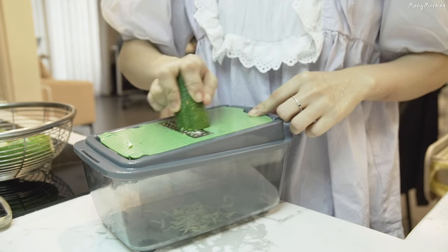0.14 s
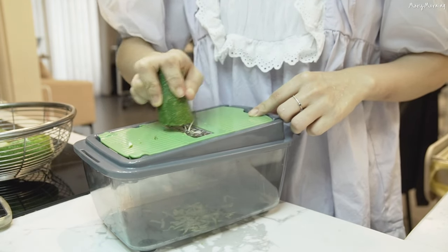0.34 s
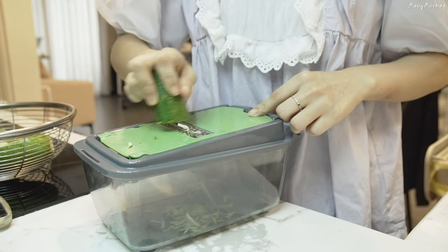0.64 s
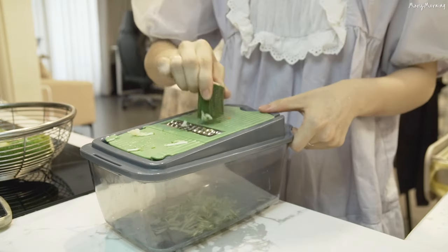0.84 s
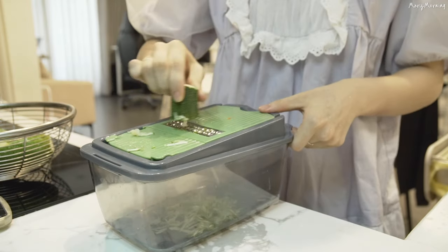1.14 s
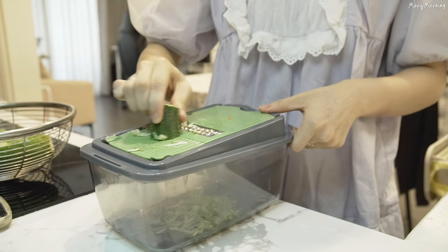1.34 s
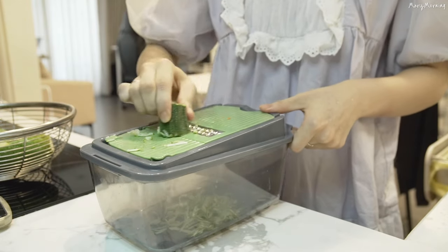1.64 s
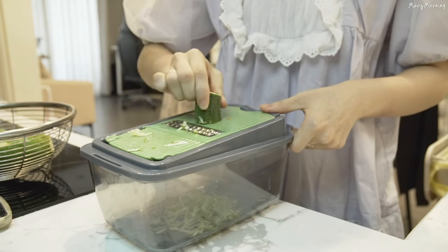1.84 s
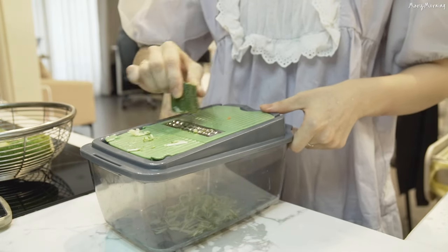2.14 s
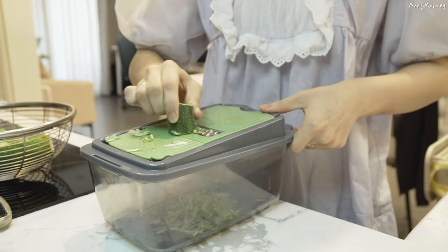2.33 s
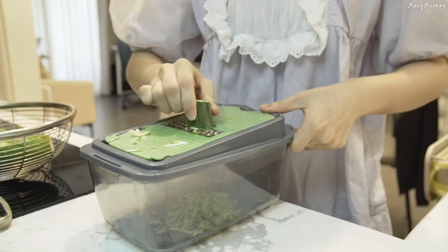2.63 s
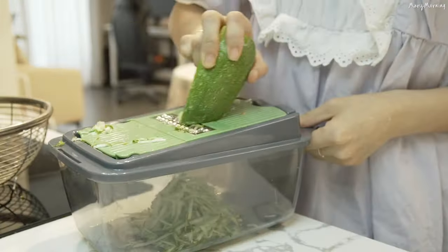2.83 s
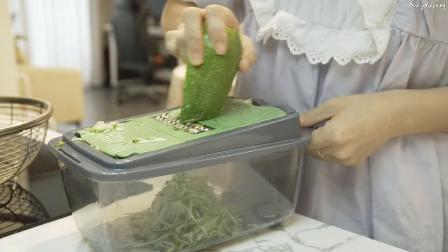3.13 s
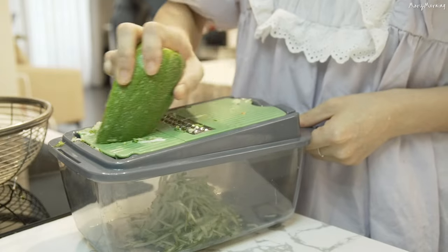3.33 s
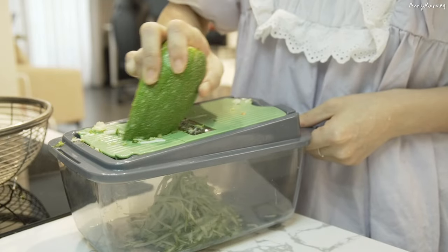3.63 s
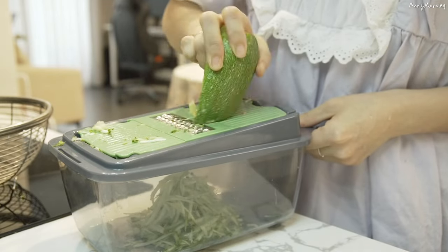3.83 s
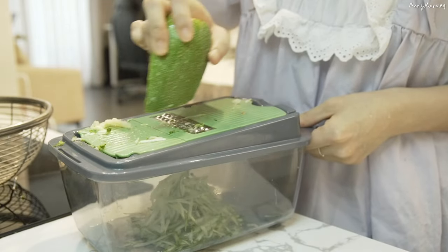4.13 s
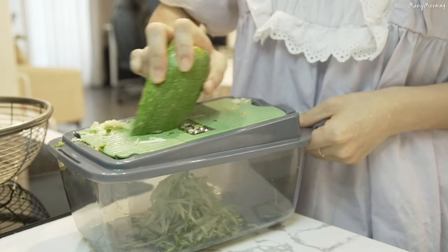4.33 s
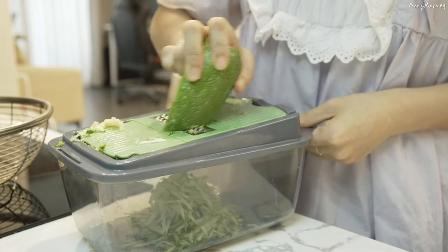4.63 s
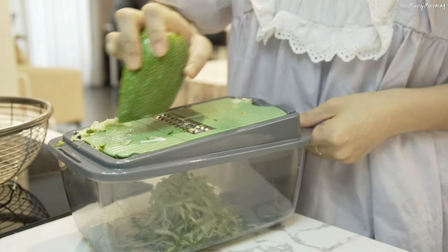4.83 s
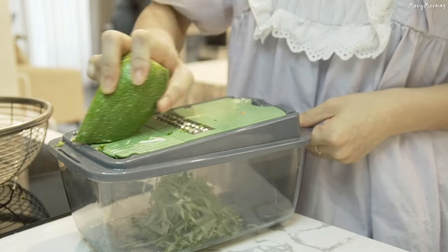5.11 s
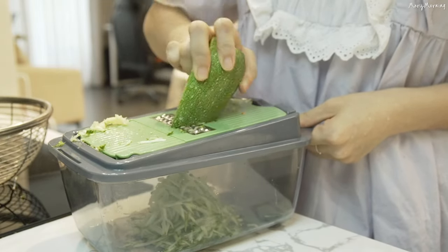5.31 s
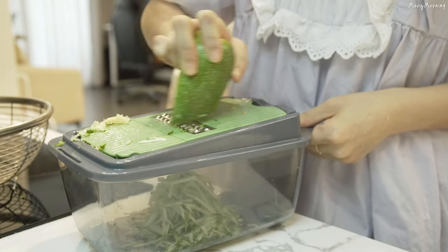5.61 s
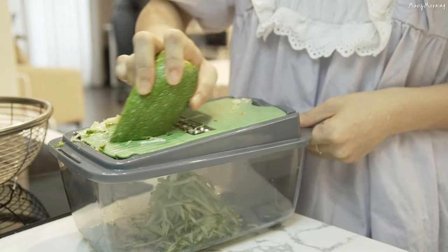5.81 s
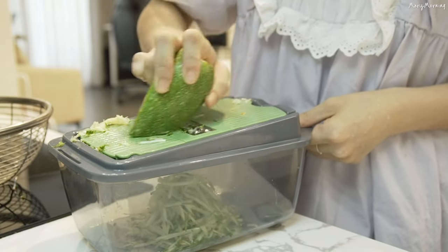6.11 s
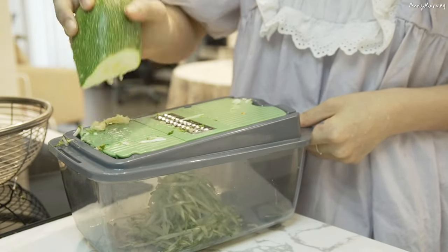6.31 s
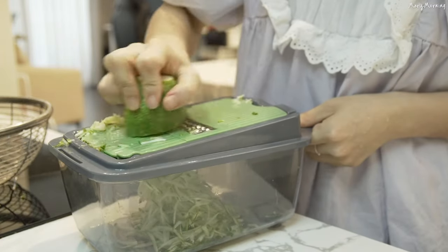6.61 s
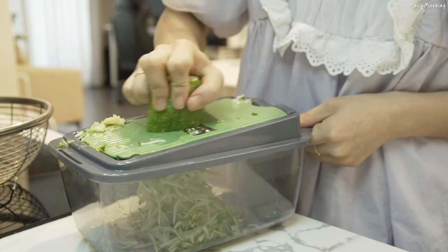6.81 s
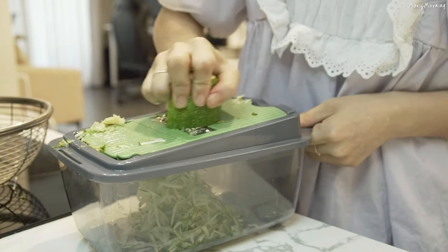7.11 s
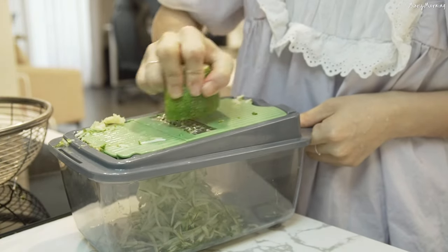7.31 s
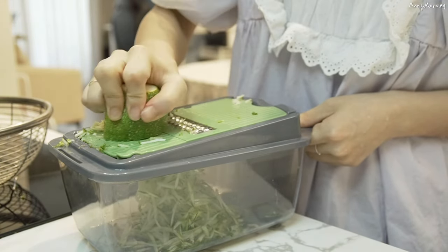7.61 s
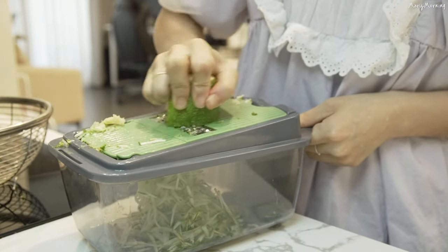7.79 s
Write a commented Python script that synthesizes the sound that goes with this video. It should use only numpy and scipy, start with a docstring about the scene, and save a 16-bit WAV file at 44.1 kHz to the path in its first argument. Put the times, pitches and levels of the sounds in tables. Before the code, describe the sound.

A close, fairly dry kitchen sound over a soft room noise. A small zucchini stub is pushed across julienne blades on a hollow plastic tub, with landings near 0.1, 0.5, 0.9, 1.2, 1.6, 1.9, 2.3 and 2.6 seconds. Each begins with a boxy, mid-low plastic knock, turns at once into a crisp wet rasp of about a fifth of a second, and fades in a slight rub. Dull tub jolts and light plastic ticks fall between. From 2.8 seconds a bigger piece continues at the same brisk pace, roughly every 0.35 seconds: landings are softer in thud but wetter and slappier, especially from 3.5 to 5 seconds, while hollow knocks of the rocking tub stand out between cuts. After about 6.4 seconds the slaps soften and rasping dominates, with a last stroke near 7.8 and a closing knock around 7.9.

```python
"""Zucchini on a julienne slicer

A short stub, then a big piece, is pushed over a julienne slicer on a plastic tub in a small kitchen.
Noisy contact forces ring tub, lid, blade plate and blade: each push lands with a knock,
tears through the blades as a wet rasp of random snaps, then rubs on. Jolts rock the tub at its main mode.
Light taps, a faint table boom, near echoes, a short room tail and soft room noise complete it."""
import sys
import numpy as np
from scipy import signal
from scipy.fft import rfft, irfft
from scipy.io import wavfile

SR = 44100
rng = np.random.default_rng(int(sys.argv[2]) if len(sys.argv) > 2 else 0)


def dump(signal):
    """Clip the signal to [-1, 1] and save it as 16-bit WAV at the path in sys.argv[1]."""
    limited = np.clip(np.atleast_2d(signal).T, -1, 1)
    pcm = np.round(limited * 32767).astype(np.int16)
    wavfile.write(sys.argv[1], SR, pcm)


N = 350595

# pushes; times after touchdown, levels relative: touchdown_s, thud_db, slap_db, reach_blades_s, end_s, effort_db
STROKES = [(0.124, -16, -37.5, 0.023, 0.22, -29), (0.457, -16, -62, 0.032, 0.14, -24),
           (0.916, -19, -53, 0.024, 0.15, -24), (1.235, -17.5, -55, 0.014, 0.17, -25),
           (1.558, -15.5, -56, 0.021, 0.21, -26), (1.892, -24.5, -59, 0.033, 0.21, -25),
           (2.255, -15, -49.5, 0.018, 0.21, -27.7), (2.601, -16, -37.5, .008, 0.21, -28.5),
           (2.843, -25, -39, 0.021, 0.16, -24.5), (3.181, -30, -41.5, 0.028, 0.18, -25),
           (3.524, -22.5, -32, 0.028, 0.21, -24.5), (3.865, -23, -28, 0.016, 0.19, -24),
           (4.229, -26, -34.5, 0.06, 0.21, -23.5), (4.589, -22.5, -29, .026, 0.23, -24.5),
           (4.97, -21.5, -29, .022, 0.21, -25), (5.338, -25, -39.5, .028, .2, -23),
           (5.681, -34, -47, 0.027, 0.19, -23.5), (6.04, -29.5, -34, .014, 0.2, -24.5),
           (6.391, -26.5, -56, 0.049, 0.21, -24), (6.735, -30.5, -61, .036, 0.2, -24.5),
           (7.08, -26, -61, .032, 0.22, -25), (7.418, -31.5, -63, 0.057, 0.23, -24.5),
           (7.764, -28.5, -47.5, 0.039, 0.25, -25)]
# jolts over or off the blades that rock the tub: start_s, relative_level_db
BUMPS = [(0.372, -30), (0.623, -14.5), (0.765, -20.5), (1.067, -18), (1.091, -16.5), (1.41, -14.5),
         (1.433, -18), (1.754, -17.5), (1.977, -15), (2.442, -10.5), (2.525, -29), (3.008, -17),
         (3.273, -9.5), (3.647, -8.5), (3.953, -13), (4.042, -11.5), (4.061, -16), (4.407, -9),
         (4.44, -20.5), (4.777, -11.5), (4.799, -14.5), (5.15, -9.5), (5.43, -14.5), (5.514, -14.5),
         (5.789, -19), (6.218, -8.5), (6.476, -12), (6.557, -15.5), (6.867, -10.5), (7.938, -14)]
# light taps of plastic and falling strips: start_s, relative_peak_db
TAPS = [(0.0094, -33), (0.682, -22), (0.7387, -26), (1.9404, -20), (2.0824, -23.5), (2.1755, -27),
        (2.2223, -27.5), (3.153, -29.5), (3.518, -19.5), (3.809, -34), (4.125, -30), (5.1487, -18.5),
        (5.9244, -36.5), (6.7221, -27), (6.9444, -27.5)]
# slicer resonances: centre_hz, width_hz, stub_db, big_piece_db
TUB_MODES = [(282.5, 51, -6, -10), (320, 20.2, -2.5, -1.5), (355.6, 15, 2, 1.5), (448.5, 14, 1.5, -10)]
LID_MODES = [(569, 66.5, -9, -9), (615.6, 46.3, -7, -6.5), (698.7, 25, -7.5, -11), (790, 74, -13, -14),
             (939, 29.6, -10, -12), (1135, 52, -14, -15), (1348, 54, -24, -22.5)]
PLATE_MODES = [(1568, 93, -15, -14.5), (1776, 79, -10.5, -14), (1958, 135, -11.5, -14.5),
               (2017, 53, -7, -11.5), (2200, 194, -19, -19), (2439, 69, -16.5, -17),
               (2752, 200, -18.5, -18), (3100, 233, -19, -23), (3240, 280, -18.5, -21)]
BLADE_MODES = [(2192, 19, -12, 0), (2287, 32, 1, -4.5)]
# colour of the wet tearing: frequency_hz, relative_db
HISS_COLOUR = [(2200, -21.5), (3200, -10), (3900, 6.5), (5000, 1), (6200, -0.5), (7800, -2.5), (10000, -4),
               (13000, -9.5), (16000, -13.5)]
# colour of the wet face slapping down: frequency_hz, relative_db
SLAP_COLOUR = [(2000, -29.5), (3200, -4), (5000, -11), (6500, -11.5), (9000, -18.5), (11500, -26.5),
               (16000, -26)]
# colour of the room noise: frequency_hz, relative_db
QUIET_COLOUR = [(18, -26), (30, -30), (145, -3.5), (355, 3.5), (1220, -9.5), (1390, -5.5), (2750, -15),
                (3580, -16.5), (3980, -20), (5040, -19), (5450, -21.5), (7870, -25), (9460, -17.5),
                (10200, -24.5), (16000, -28.5)]
# colour of what table and walls send in from the sides: frequency_hz, relative_db
SIDEWAYS_COLOUR = [(100, -23), (350, -22), (600, -11.5), (850, -1), (1200, -7), (2000, -5.5), (4000, -1.5),
                   (9000, -1), (16000, 0)]
# colour of the late room: frequency_hz, relative_db
ROOM_COLOUR = [(100, -4), (350, 1.5), (800, 3), (2500, 2.5), (6000, 0.5), (16000, -5)]

BIG_PIECE_S = 2.82  # the big piece is sliced from here on
TOP_HZ, TABLE_HZ = 16000, 90.1

# pairs: (stub, big piece)
FULL_CUT_S = (0.051, 0.1)  # after touchdown: all blades are in
EASE_S = (0.116, 0.12)  # after touchdown: the piece begins to run out of the blades
# cut levels relative to effort
CUT_TUB_DB, CUT_LID_DB, CUT_HISS_DB = (-1.2, 0.5), (-1.3, -1.46), (-5, -3.5)
# landing: lid follows thud, blade follows slap, plate takes some of each
LAND_LID_DB, LAND_PLATE_DB, LAND_BLADE_DB = (-9, -8.5), (2.2, 0.3), (-9, -1.3)
PLATE_SLAP_SHARE, BLADE_SLAP_SHARE = 0.51, 0.79

# the tub rocks lower under the hand's load and rises as the push lets up
LOADED_HZ, FREE_HZ = 324, 352
LET_UP_S = (0.072, 0.2)  # from, to; after touchdown
GRIP_SCATTER = 0.015  # pitch spread from jolt to jolt, as a share


def undb(db):
    """Decibels to gain."""
    return 10 ** (np.asarray(db) / 20)


def seconds(length_s):
    """Time axis."""
    return np.arange(int(length_s * SR)) / SR


def rms(x):
    """Root mean square, kept above zero."""
    return np.sqrt(np.mean(x ** 2)) + 1e-12


def add(track, start_s, x):
    """Mix x into the track at start_s."""
    i = max(int(start_s * SR), 0)
    track[i:i + len(x)] += x[:max(N - i, 0)]


def colour(x, points, size=2048):
    """Minimum-phase filter through (Hz, dB) points, falling 12 dB per octave below the first."""
    hz, db = np.transpose(points)
    f = np.maximum(np.arange(size // 2 + 1) * SR / size, 1)
    below_db = 40 * np.log10(np.clip(f / hz[0], 0.03, 1))
    response_db = np.interp(np.log(f), np.log(hz), db) + below_db
    # folding the cepstrum makes the filter causal
    cepstrum = irfft(np.log(undb(response_db)))
    cepstrum[1:size // 2] *= 2
    cepstrum[size // 2 + 1:] = 0
    impulse = irfft(np.exp(rfft(cepstrum)))
    return signal.fftconvolve(x, impulse)[:len(x)]


def ring(force, modes, start_s, detune=0.015):
    """Force excites modes of alternating sign; the hand's load shifts them a little each time."""
    out = 0
    for k, (hz, width_hz, stub_db, big_db) in enumerate(modes):
        hz = hz * (1 + detune * rng.standard_normal())
        band = signal.lfilter(*signal.iirpeak(hz, hz / width_hz, fs=SR), force)
        level_db = stub_db if start_s < BIG_PIECE_S else big_db
        out = out + (-1) ** k * undb(level_db) * band
    return out


def snaps(t, rate_hz, spread_db):
    """Random train of tiny ruptures of either sign and uneven size."""
    size = undb(spread_db * rng.standard_normal(len(t)))
    sign = rng.choice([-1, 1], len(t))
    return size * sign * (rng.random(len(t)) < rate_hz / SR)


def judder(t, rate_hz, depth_db):
    """Uneven grip of the flesh on the surface, as a gain."""
    knots = np.arange(int(t[-1] * rate_hz) + 2)
    return undb(depth_db * np.interp(t * rate_hz, knots, rng.standard_normal(len(knots))))


def blow(t, settle_s, chatter):
    """Contact force: one sharp touch, then chatter as the surfaces settle."""
    force = rng.standard_normal(len(t)) * np.exp(-t / settle_s)
    force *= chatter / np.linalg.norm(force)
    force[0] += 1
    return force


def background(floor_db=-44.5):
    """Soft coloured room noise, alike on both sides in the bass."""
    mid, side = (colour(rng.standard_normal(N), QUIET_COLOUR) for _ in range(2))
    wide = np.array([[1], [-1]]) * colour(side, SIDEWAYS_COLOUR)
    return undb(floor_db) * (mid + wide) / rms(mid)


def tap(start_s, level_db, lid_db=-0.5, tick_db=-25):
    """Light touch that rings plate and lid."""
    force = blow(seconds(0.2), settle_s=0.02, chatter=5.5)
    x = ring(force, PLATE_MODES, start_s, detune=0.064)
    x = x + undb(lid_db) * ring(force, LID_MODES, start_s)
    x = x + undb(tick_db) * colour(force, SLAP_COLOUR)
    return undb(level_db + 1.5) * x / np.abs(x).max()


def landing(start_s, tub_db, lid_db, plate_db, slap_db, blade_db,
            damp_s=0.076, squash_s=0.0025, lowest_hz=150, second_s=0.011, second_db=-7):
    """The cut face lands: softly it squashes on and rattles, hard it slaps and pings the blade."""
    t = seconds(0.3)
    attack = t < 0.03
    softness = np.clip((tub_db - slap_db - 8.5) / 20, 0.02, 1)
    force = blow(t, settle_s=0.0074 + 0.0039 * softness, chatter=5.8)
    force = force * np.minimum(t / (squash_s * softness), 1)
    # one edge touches first, then the rest of the face
    second = blow(seconds(0.2), settle_s=0.015, chatter=7.2)
    add(force, second_s * rng.uniform(0.7, 1.3), undb(second_db) * second)
    # the hand soon damps the tub, which is too small to radiate deep bass
    thud = ring(blow(t, settle_s=0.015, chatter=0.74), TUB_MODES, start_s, detune=0.02)
    thud = thud * np.exp(-(t / damp_s) ** 2)
    thud = signal.sosfilt(signal.butter(2, lowest_hz, "highpass", fs=SR, output="sos"), thud)
    ping = ring(blow(t, settle_s=0.0084, chatter=0.72), BLADE_MODES, start_s, detune=0.0021)
    parts = [(thud, tub_db - 0.3),
             (ring(force, LID_MODES, start_s), lid_db + 0.1),
             (ring(force, PLATE_MODES, start_s, detune=0.037), plate_db + 0.1),
             (colour(force, SLAP_COLOUR), slap_db + 1.5),
             (ping, blade_db + 0.5)]
    return sum(x * undb(db) / rms(x[attack]) for x, db in parts)


def set_down(start_s, thud_db, slap_db, piece):
    """A landing's weight and wetness decide how much lid, plate and blade ring."""
    lid_db = thud_db + LAND_LID_DB[piece]
    plate_db = thud_db + PLATE_SLAP_SHARE * (slap_db - thud_db) + LAND_PLATE_DB[piece]
    blade_db = BLADE_SLAP_SHARE * slap_db + LAND_BLADE_DB[piece]
    return landing(start_s, thud_db, lid_db, plate_db, slap_db, blade_db)


def table_boom(x, width_hz=7, boom_db=11, kick_db=-27, t60_s=0.78, swell_s=0.011):
    """The table booms faintly: each landing kicks its mode and the slicer's sounds keep it going."""
    edges_hz = [TABLE_HZ - width_hz / 2, TABLE_HZ + width_hz / 2]
    band = signal.butter(2, edges_hz, "bandpass", fs=SR, output="sos")
    out = undb(boom_db) * signal.sosfilt(band, x)
    t = seconds(0.8)
    envelope = (1 - np.exp(-t / swell_s)) * np.exp(-np.log(1000) * t / t60_s)
    boom = np.sin(2 * np.pi * TABLE_HZ * t) * envelope
    for start_s, thud_db, *_ in STROKES:
        add(out, start_s, undb(thud_db + kick_db) * boom)
    return out


def stroke(start_s, bite_s, end_s, run_out_s, tub_db, lid_db, plate_db, hiss_db,
           onset=0.89, taper=1.125, tint_db=1.67, brighten=0.18):
    """Bursting cells hiss and shake the plate, fibres shake the lid, coarser slips drum on the tub."""
    t = seconds(0.4)
    bite = np.clip(t / max(bite_s, 0.004), 0, 1) ** onset
    run_out = np.clip((end_s - start_s - t) / max(run_out_s, 0.004), 0, 1) ** taper
    contact = bite * run_out
    drag = contact * judder(t, rate_hz=151, depth_db=2.0)
    cells = snaps(t, rate_hz=12000, spread_db=3.5)
    skin = undb(7.5) * snaps(t, rate_hz=220, spread_db=1.5)  # tough: fewer, bigger snaps
    tearing = drag * (cells + skin)
    fibres = drag * snaps(t, rate_hz=2500, spread_db=1.5)
    slips = drag * snaps(t, rate_hz=500, spread_db=0.0)
    # each cut has a slightly different colour
    tint = [(hz, db + tint_db * rng.standard_normal()) for hz, db in HISS_COLOUR]
    hiss = colour(tearing * contact ** brighten, tint)  # strongest when all blades are in
    parts = [(ring(slips, TUB_MODES, start_s, detune=0.031), tub_db + 1.16),
             (ring(fibres, LID_MODES, start_s), lid_db + 0.1),
             (ring(tearing, PLATE_MODES, start_s), plate_db + 0.39),
             (hiss, hiss_db + 0.82)]
    return sum(x * undb(db) * rms(contact) / rms(x) for x, db in parts)


def slide(start_s, lid_db, rub_db=-13, fade_s=0.05):
    """Past the blades the wet face rubs on over the smooth plastic and dies away."""
    t = seconds(0.3)
    fade = np.exp(-t / fade_s)
    rub = fade * snaps(t, rate_hz=1500, spread_db=5) * judder(t, rate_hz=63, depth_db=6.5)
    parts = [(ring(rub, TUB_MODES, start_s), 0),
             (ring(rub, LID_MODES, start_s), -1.5),
             (ring(rub, PLATE_MODES, start_s), -5),
             (colour(rub, HISS_COLOUR), -3)]
    mix = sum(x * undb(db) / rms(x) for x, db in parts)
    return undb(lid_db + rub_db) * rms(fade) * mix


def push(touchdown_s, thud_db, slap_db, reach_s, length_s, effort_db):
    """One push, as timed sounds: the piece lands, bites in, runs out of the blades and slides on."""
    piece = int(touchdown_s > BIG_PIECE_S)
    start_s, end_s = touchdown_s + reach_s, touchdown_s + length_s
    bite_s, run_out_s = FULL_CUT_S[piece] - reach_s, length_s - EASE_S[piece]
    tub_db = effort_db + CUT_TUB_DB[piece]
    lid_db = effort_db + CUT_LID_DB[piece]
    hiss_db = effort_db + CUT_HISS_DB[piece]
    leaves_s = end_s - run_out_s / 2
    cut = stroke(start_s, bite_s, end_s, run_out_s, tub_db, lid_db, effort_db, hiss_db)
    return [(touchdown_s, set_down(touchdown_s, thud_db, slap_db, piece)),
            (start_s, cut),
            (leaves_s, slide(leaves_s, lid_db))]


def rocking_hz(time_s):
    """The tub's main pitch under the hand's load, set by the time since the last touchdown."""
    since_s = min(time_s - row[0] for row in STROKES if row[0] <= time_s)
    hz = np.interp(since_s, LET_UP_S, (LOADED_HZ, FREE_HZ))
    return hz * (1 + GRIP_SCATTER * rng.standard_normal())


def bump(start_s, level_db, hz, push_s=0.0063, wall_db=-9, lid_db=-15):
    """A jolt swells and dies in the tub's main mode, slower when gentle; walls and lid ring too."""
    t = seconds(0.25)
    swell = t / (push_s * undb(-0.3 * (level_db + 13.5)))
    rock = (swell * np.exp(1 - swell)) ** 1.3 * np.sin(2 * np.pi * hz * t)
    force = blow(t, settle_s=0.018, chatter=5)
    rings = [(ring(force, TUB_MODES, start_s), wall_db), (ring(force, LID_MODES, start_s), lid_db)]
    ringing = sum(x * undb(db) / np.abs(x).max() for x, db in rings)
    return undb(level_db - 1.0) * (rock + ringing)


def reflections(x, t60_s, first_s, points):
    """Dense coloured echoes that begin after first_s and die away."""
    t = seconds(0.7)
    echoes = rng.standard_normal(len(t)) * np.exp(-np.log(1000) * t / t60_s) * (t > first_s)
    return colour(signal.fftconvolve(x, echoes / np.linalg.norm(echoes))[:N], points)


def near_echoes(x, turn_hz=4.6):
    """Reflections off tub, hand and table; two echo patterns blend in a steady rotation."""
    turn = 2 * np.pi * turn_hz * np.arange(N) / SR
    here, there = (reflections(x, 0.018, 0.00044, SIDEWAYS_COLOUR) for _ in range(2))
    return here * np.cos(turn) + there * np.sin(turn)


def kitchen(x, room_db=-16, t60_s=0.42, wide_db=-1.5, box_db=-6.0, late_side_db=-1.0):
    """The tub's hollow adds a fixed fine colour, near echoes widen the slicer, a short room tail follows."""
    x = x + undb(box_db) * reflections(x, t60_s=0.04, first_s=0.001, points=SIDEWAYS_COLOUR)
    late_mid, late_side = (undb(room_db) * reflections(x, t60_s, 0.009, ROOM_COLOUR) for _ in range(2))
    side = undb(wide_db) * near_echoes(x)
    side = side + undb(late_side_db) * colour(late_side, SIDEWAYS_COLOUR)
    return x + late_mid + np.array([[1], [-1]]) * side


def scene():
    """All the slicer's sounds and the table boom, heard in the kitchen over soft noise."""
    slicer = np.zeros(N)
    for row in STROKES:
        for start_s, sound in push(*row):
            add(slicer, start_s, sound)
    for start_s, level_db in BUMPS:
        add(slicer, start_s, bump(start_s, level_db, rocking_hz(start_s)))
    for start_s, level_db in TAPS:
        add(slicer, start_s, tap(start_s, level_db))
    return kitchen(slicer + table_boom(slicer)) + background()


def record(dry):
    """Steep low-pass at TOP_HZ."""
    return signal.sosfilt(signal.ellip(10, 0.1, 80, TOP_HZ, fs=SR, output="sos"), dry)


dry = scene()
out = record(dry)
dump(out)
```